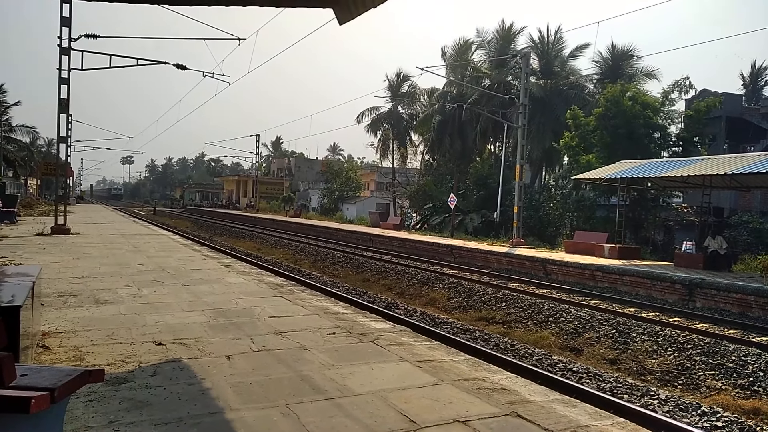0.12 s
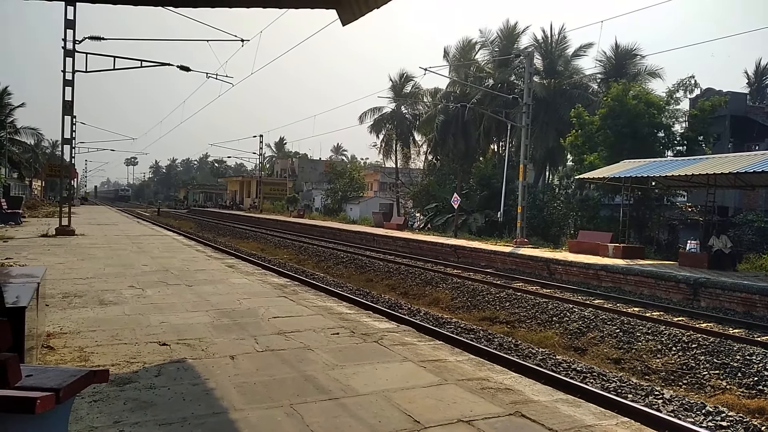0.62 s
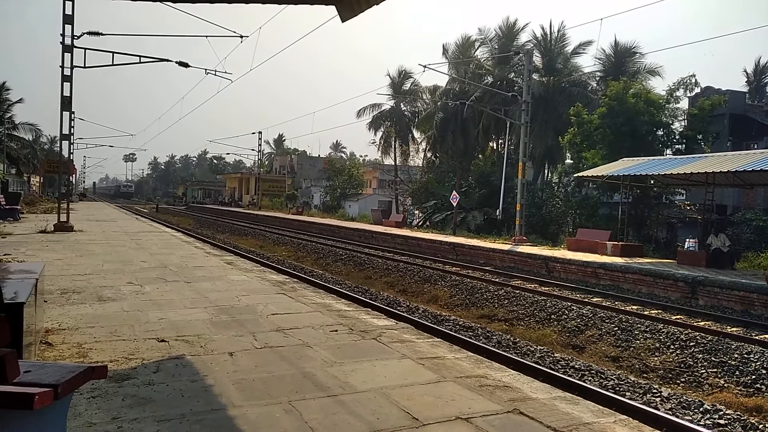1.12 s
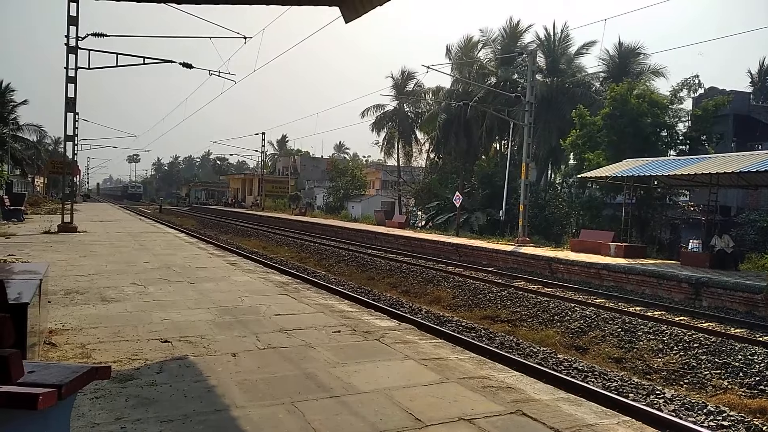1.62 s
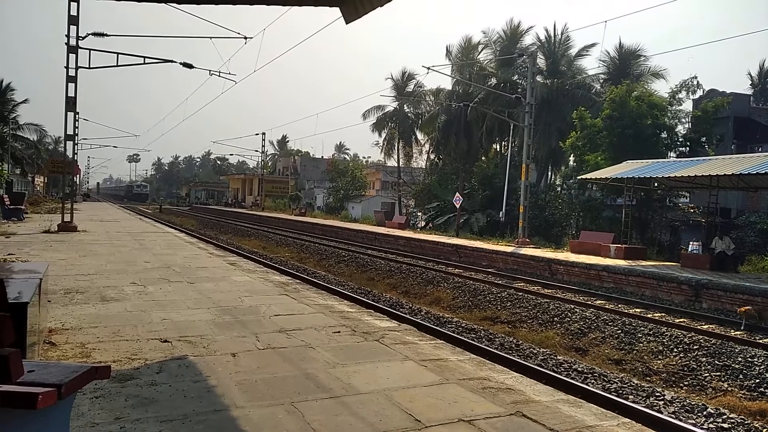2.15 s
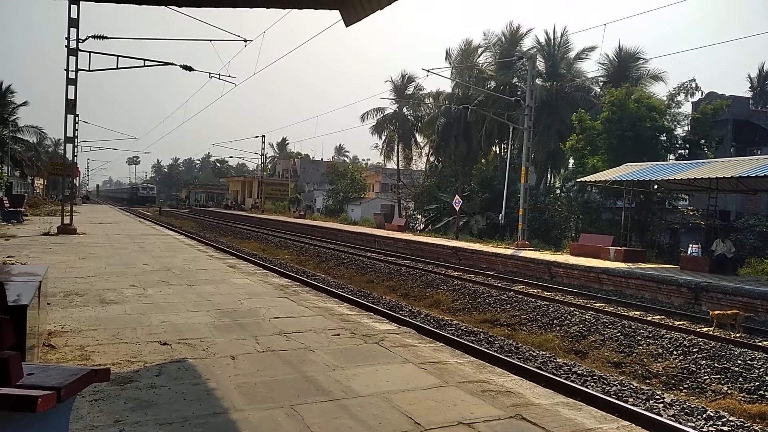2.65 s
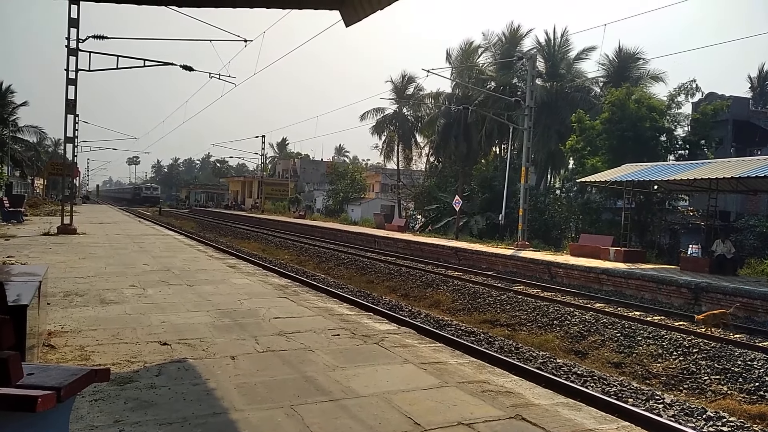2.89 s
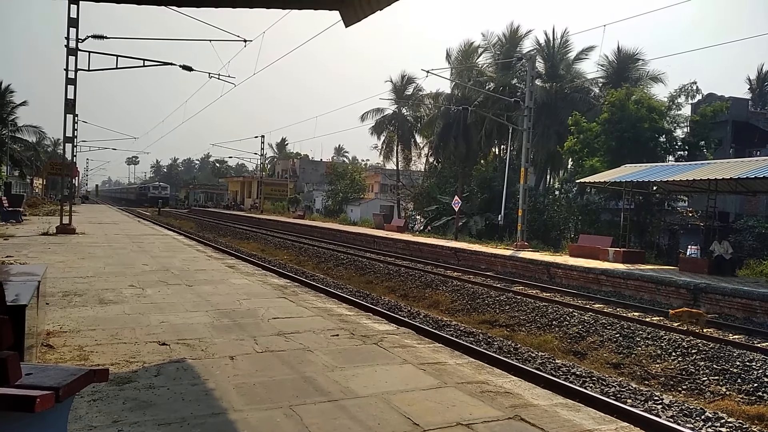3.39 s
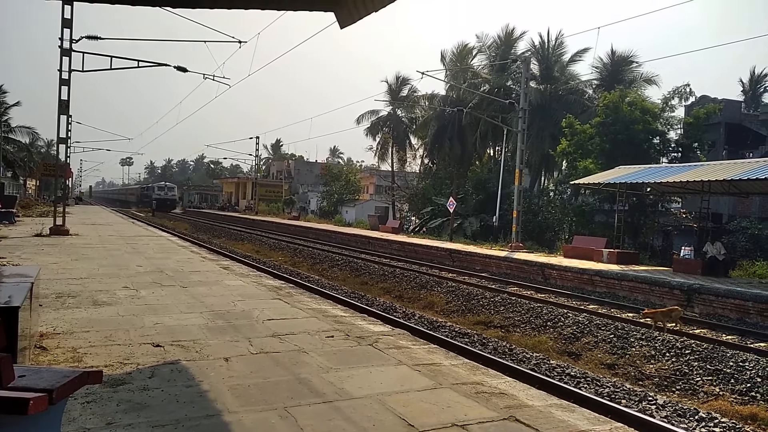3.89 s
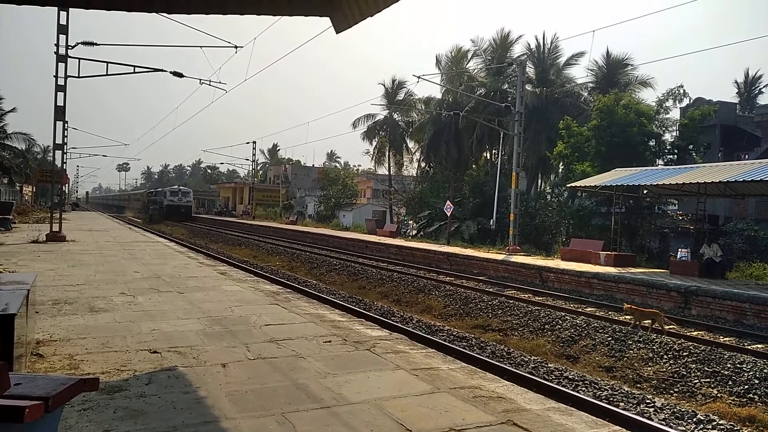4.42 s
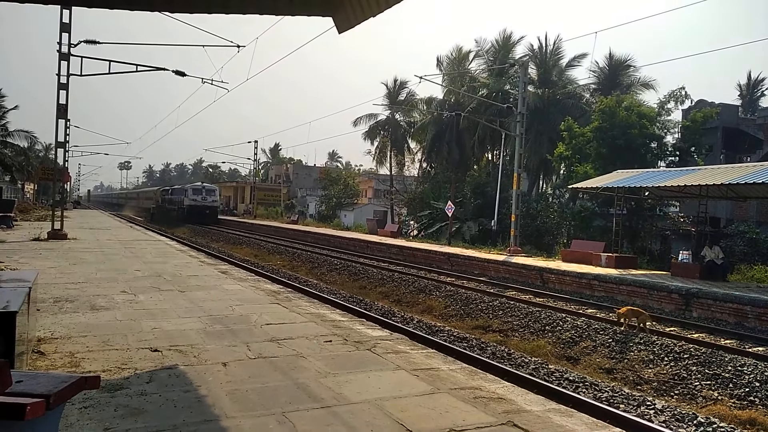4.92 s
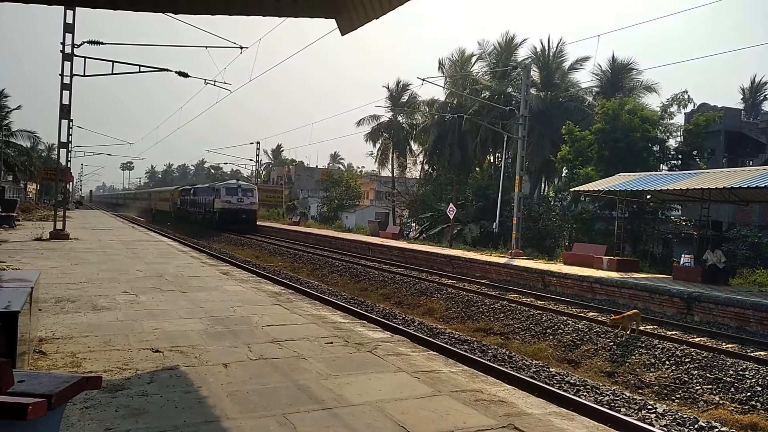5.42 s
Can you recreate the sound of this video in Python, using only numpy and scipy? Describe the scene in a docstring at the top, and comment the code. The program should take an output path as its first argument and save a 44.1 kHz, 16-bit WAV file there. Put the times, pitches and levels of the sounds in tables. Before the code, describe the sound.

A diesel locomotive comes towards a platform. After a brief hushed start with tiny chirps, its dissonant reed horn holds one long blast, buzzing and fluttering in the air, then cuts off into scattered echoes. Engine throbs, wheel roar, wandering whines and clatter come forward, with a breathy falling squeal and rising hiss. Outdoor, dry, small stereo device with close-set microphones, slightly overloaded on the horn.

```python
"""Station platform: a diesel locomotive comes fast and holds its two-tone air horn for about three seconds.
Two reed trumpets a tritone apart are summed from partials; squaring breeds sum and difference tones.
The engine throbs on shaft orders under boomy noise; wheels roar as noise bands and knock as struck modes.
The treble hisses in swells and a bird chirps far off in gliding tones.
Two microphone ports a few centimetres apart differ in level, phase and noise."""
import sys
import numpy as np
from scipy import signal
from scipy.fft import rfft, irfft, next_fast_len
from scipy.io import wavfile
from scipy.ndimage import uniform_filter1d, minimum_filter1d, map_coordinates

SR = 44100
rng = np.random.default_rng(int(sys.argv[2]) if len(sys.argv) > 2 else 0)


def dump_mix(stems):
    """Bounce the given channels to the path in sys.argv[1] as a 16-bit WAV at rate SR."""
    frames = np.atleast_2d(stems).T  # one column per channel
    limited = np.clip(frames, -1, 1)  # hard clip at full scale
    pcm = np.round(limited * 32767).astype(np.int16)
    wavfile.write(sys.argv[1], SR, pcm)


def amplitude_ratio(level_db):
    """Convert a level in decibels to the matching linear amplitude (field) ratio."""
    exponent = np.asarray(level_db, float) / 20
    return 10 ** exponent


N = 244314
T = np.arange(N) / SR
SIDES = np.array([[1], [-1]])  # left, right
PORT_LAG_S = .00019  # broad noise reaches the left port this late
OPEN_S, MIDDLE_S = .47, 2.2  # horn valve opens; middle of the blast


def read(table):
    """Columns of a table interpolated over time."""
    s, *columns = np.transpose(table)
    return [np.interp(T, s, c) for c in columns]


def at(table, hz):
    """Value of a spectrum table on a log frequency axis."""
    f, v = np.transpose(table)
    return np.interp(np.log(hz + 1), np.log(f + 1), v)


def unit(x):
    """Scale to rms 1."""
    return x / np.sqrt(np.mean(x ** 2))


def walk(rate, count=1):
    """Smooth chance with spread near 1, turning about rate times a second."""
    knots = rng.standard_normal((count, 600))
    return np.array([map_coordinates(k, [T[::16] * rate], order=3).repeat(16)[:N] for k in knots])


def noise(gain, alike_hz=2050.0):
    """Stereo noise with gain(Hz), rms 1; the bass is nearly alike at both ports, the treble less so."""
    # Each row: frequency in Hz, left minus right in dB.
    noise_balance = [(100, 0), (2000, -0.5), (3000, 0), (4400, -3), (5300, -11), (6200, -9), (8000, 3.5)]
    size = next_fast_len(N)
    f = np.fft.rfftfreq(size, 1 / SR)
    mid, side = rfft(rng.standard_normal((2, size)))
    apart = np.clip(f / alike_hz, .26, .8)
    ports = (mid + SIDES * apart * side) / np.sqrt(1 + apart ** 2)
    balance = amplitude_ratio(SIDES * at(noise_balance, f) / 2)
    lag = np.exp(-1j * np.pi * f * PORT_LAG_S * SIDES)
    return unit(irfft(gain(f) * balance * lag * ports)[:, :N])


def glides(table, blur_db):
    """Short gliding near-sines, blurred by a random level."""
    out = np.zeros(N)
    for s, length_s, f0_hz, f1_hz, db in table:
        u = np.clip((T - s) / length_s, 0, 1)
        turn = 2 * np.pi * np.cumsum(f0_hz + (f1_hz - f0_hz) * u) / SR
        out += amplitude_ratio(db + blur_db * walk(59.0)[0]) * np.sin(np.pi * u) * np.cos(turn)
    return out * np.sqrt(2)


def pitch(hz, sharp, settle_s, lift):
    """A reed starts sharp, settles quickly and lifts a little as the valve shuts."""
    lift_s, lift_width_s = 3.875, .055
    settling = np.exp(-(np.clip(T - OPEN_S, 0, None) / settle_s) ** .72)
    return hz * (1 + sharp * settling + lift * np.exp(-((T - lift_s) / lift_width_s) ** 2))


def blast(k, speaks_s, db, drift_db_per_s, bow_db, dies_s, burst_db):
    """Level in dB of one partial: quick rise with a burst, a drifting hold, a fall into a slower echo."""
    half_s, burst_s = 1.6, .02
    speak_db_per_s, die_db_per_s = 2201.5, 350
    surge_s, surge_width_s = 3.895, .045
    u = np.clip((T - MIDDLE_S) / half_s, -1, 1)
    hold = db + drift_db_per_s * half_s * u + bow_db * u ** 2
    since, after = T - speaks_s, np.clip(T - dies_s, 0, None)
    burst = burst_db * np.exp(-np.abs(since) / burst_s)
    rise = np.where(since < 0, burst_db + speak_db_per_s * since, burst)
    # the lowest tones surge as the valve shuts
    surge_db = 4.0 / k ** 2 * np.exp(-((T - surge_s) / surge_width_s) ** 2)
    # upper partials leave a stronger echo that dies faster
    echo_db = -16.5 / k ** 0.51 - 51 * k ** 0.28 * after
    return hold + rise + surge_db + np.maximum(-die_db_per_s * after, echo_db)


def trumpet(hz, table, burst_db, count, upper, start, bend):
    """A reed's pulse train as partials; moving air and ground bounce make each waver, the higher the more."""
    # The air between train and platform makes the chord waver.
    # Each row: time in seconds, change of the lowest tones in dB, change of the upper tones in dB.
    waver_db = [(.6, -9, 6), (.85, -3.5, 5), (1.15, -6.5, 3), (1.4, -0.5, 1.5), (1.62, -5, 0),
                (1.9, 0.5, 1), (2.2, 2.5, 0), (2.42, -0.5, -1), (2.62, 4.5, -0.5), (2.85, -3, 0),
                (3.1, -2, 1), (3.4, -3.5, 1.5), (3.6, -4.5, 0.5), (3.8, -6, 1)]
    # The brassy partials fade and return. Each row: time in seconds, change in dB.
    brass_db = [(.6, -1), (1.0, 1), (1.6, 2.5), (2.2, -0.5), (2.5, 0.5), (2.9, -3.5), (3.3, 2.5),
                (3.8, -0.5)]
    # Phase of the front at the ports. Each row: frequency in Hz, lead of the left in radians.
    port_phase = [(0, 0), (320, 0.31), (460, 0.44), (650, -0.26), (920, -0.74), (1290, -1.5), (1390, -1.02),
                  (1610, -2.5), (1840, -1.5), (1940, -2.5), (2260, -3), (2580, -2.5), (2770, -3.5),
                  (2900, -4), (3230, -4), (3690, -4.5), (4150, -5.5), (4840, -6.2), (5510, -7),
                  (8610, -11.5)]
    # Level of the front at the ports. Each row: frequency in Hz, left minus right in dB.
    port_balance = [(100, -1), (320, 1), (460, -2.5), (650, 0.2), (920, 7.5), (970, -6.5), (1290, 3),
                    (1600, 1), (1940, 4), (2260, -4), (2600, -1.5), (3700, -2), (4400, -2), (4900, -10.5),
                    (5500, -9), (6500, 6), (9000, 11)]
    brass_hz = 2700., 3200.  # where the brass fading sets in
    late_hz, late_db, late_s = 4900., -15, 0.42  # the highest partials build up slowly
    scatter = .08  # blur of a partial at 1 kHz by moving air
    calm_share = 0.62  # the chord wavers less at first
    flutter, rasp = 1.0, .2  # shares of quicker blur
    shared_waver = 0.34  # crossfeed of the wavering between ports
    valve_shut_s, echo_scatter = 3.85, 1.06

    strong = [round(row[0]) for row in table[:-1]]
    db = [blast(*row, burst_db) for row in table]
    turn = 2 * np.pi * np.cumsum(hz) / SR
    # once the valve shuts only scattered echoes are left
    echoes = echo_scatter * np.clip((T - valve_shut_s) / 0.13, 0, 1)
    calm = np.interp(T, [OPEN_S, MIDDLE_S], [calm_share, 1])
    late = late_db * np.exp(-np.clip(T - OPEN_S, 0, None) / late_s)
    low_db, upper_db = read(waver_db)
    brassy_db = read(brass_db)[0]
    out = np.zeros((2, N))
    for k in range(1, count + 1):
        f = k * hz[N // 2]
        if k in strong:
            level_db = db[strong.index(k)]
        else:
            level_db = db[-1] + np.interp(k, *np.transpose(upper))
        level_db = level_db + low_db + (upper_db - low_db) * min(f / 1000, 1)
        level_db = level_db + np.interp(f, brass_hz, [0, 1]) * brassy_db + (f > late_hz) * late
        share = min(scatter * (f / 1000) ** 1.36, 2.5) * calm + echoes
        waver = walk(5.09, count=4)
        waver = waver + (flutter + echoes) * walk(22., count=4)
        waver = waver + (rasp + echoes / 2) * walk(90., count=4)
        alone = waver.reshape(2, 2, N)  # real or imaginary, port, time
        re, im = share * (alone + shared_waver * alone[:, ::-1]) / np.hypot(1, shared_waver)
        lead = np.interp(f, *np.transpose(port_phase))
        phase = k * turn + start * (k - 1) - bend * k ** 2 + np.array([[lead], [0]])
        ports = amplitude_ratio(SIDES * at(port_balance, f) / 2) * np.sqrt(2 / (1 + 2 * share ** 2))
        out += ports * amplitude_ratio(level_db) * ((1 + re) * np.cos(phase) - im * np.sin(phase))
    return out


def horn():
    """Both trumpets; loud air squares the wave a little, which breeds tones between the two stacks."""
    # Strong partials of each trumpet, the last row for all upper ones, before wavering.
    # Each row: multiple, start in seconds, mid-blast level in dB, drift in dB per second,
    # both ends over the middle in dB, end in seconds.
    low_strong = [(1, .49, -26.5, 3, 1.5, 3.93), (2, 0.49, -26.5, 2, 0.5, 3.9),
                  (4, 0.496, -26.5, -0.5, -6, 3.91), (5, 0.51, -26.5, -0.5, -4.5, 3.92),
                  (6, .493, -29, -0.5, -2.5, 3.86), (7, 0.488, -29.5, -0.5, -3, 3.84)]
    high_strong = [(1, 0.4776, -27, 2, 2.5, 3.925), (2, .478, -31, 2, 4, 3.84),
                   (3, 0.487, -26.5, 0.9, -6, 3.83), (4, .484, -28.5, 1, -9.5, 3.88),
                   (5, .487, -31.5, 1.85, 0, 3.84)]
    # Partials that follow the upper level. Each row: multiple, dB over that level.
    low_upper = [(3, -7.5), (7, -4), (8, -5.5), (9, -3.5), (10, -19), (11, -10), (12, -13.5), (13, -18.5),
                 (14, -26), (15, -21), (16, -31), (17, -23.5), (18, -41), (19, -25.5), (20, -35), (21, -42),
                 (26, -43)]
    high_upper = [(5, -2.5), (6, -5), (7, -9.5), (8, -9), (9, -12), (10, -20.5), (11, -27.5), (12, -21),
                  (13, -31), (14, -46), (18, -42)]
    # Air blown through the trumpets and scattered by the yard.
    # Each row: frequency in Hz, relative density in dB per Hz.
    blown_colour = [(150, -24), (300, 0), (550, -11.5), (800, 6), (1080, -5), (1500, -3.5), (2130, -12),
                    (2700, -3), (3050, -4), (3400, -16), (4000, -6.5), (4500, -4), (6500, -24),
                    (10000, -22), (13000, -61)]
    # settled Hz, share sharp at the start, settling s, share of lift as the valve shuts
    low_hz = pitch(322.65, .048, .033, .003)
    high_hz = pitch(460.93, .06, .026, .013)
    both = trumpet(low_hz, low_strong, 0.1, 26, low_upper, 0., 0.0897)
    both += trumpet(high_hz, high_strong, 6.4, 18, high_upper, 3.23, 0.11)
    above = signal.butter(3, 210, "high", fs=SR, output="sos")
    loudness = np.sqrt(uniform_filter1d((both ** 2).mean(axis=0), size=1500) + 1e-12)
    blown = noise(lambda f: amplitude_ratio(at(blown_colour, f))) * loudness * amplitude_ratio(-20.0 + 0.69 * walk(25.1))
    return both + 0.29 * signal.sosfilt(above, both ** 2) + blown


def horn_echoes():
    """Single horn tones that come back off the buildings around and after the valve's shutting."""
    # Each row: start in seconds, length in seconds, start in Hz, end in Hz, level in dB.
    echo_tones = [(3.84, 0.067, 1410, 1390, -27), (3.85, 0.1, 954, 968, -30), (3.89, 0.085, 980, 970, -41),
                  (3.9, 0.121, 645, 656, -21.5), (3.94, 0.075, 460, 466, -25.5),
                  (3.95, 0.085, 925, 907, -28), (3.9, 0.067, 1220, 1175, -39),
                  (3.96, 0.031, 1290, 1240, -31), (3.9, .08, 1860, 1920, -40), (3.95, 0.056, 820, 804, -33),
                  (4.0, 0.09, 662, 628, -41), (4.04, 0.045, 463, 490, -41), (4.09, 0.051, 451, 455, -31.5),
                  (4.14, 0.064, 453, 458, -36)]
    return glides(echo_tones, 2.2)


def engine():
    """Shaft orders that fade on their own, over boomy exhaust noise; the firing tone swells in long throbs."""
    # Low while the horn sounds, then throbbing. Each row: time in seconds, level in dB before trim.
    engine_level = [(0.0, -48), (0.37, -46.5), (0.59, -59), (2.42, -46.5), (2.64, -50.5), (3.32, -41),
                    (3.45, -55), (3.95, -39), (3.96, -23), (4.14, -41), (4.18, -34), (4.32, -30),
                    (4.37, -32), (4.41, -24), (4.57, -29), (4.68, -22), (4.7, -41), (4.83, -24.5),
                    (5.05, -29), (5.06, -24), (5.11, -41), (5.14, -24), (5.4, -24.5), (5.43, -29),
                    (5.48, -21), (5.54, -32)]
    # Each row: multiple of the shaft, relative level in dB.
    engine_orders = [(2, -47), (4, -16), (6, -5), (7, 0), (9, -1.5), (12, -39), (13, -23), (15, -10),
                     (17, -16)]
    # The firing tone and the order above it that answers in turns.
    # Each row: time in seconds, firing level in dB, answering level in dB, before the far and port offsets.
    firing_level = [(3.6, -47.5, -49), (3.756, -39.5, -53), (3.798, -43, -56), (3.842, -40, -41),
                    (3.966, -30, -35), (4.112, -44, -40), (4.198, -23.5, -34), (4.312, -22.5, -52),
                    (4.356, -31, -43), (4.432, -22.5, -28), (4.512, -32, -32), (4.544, -37, -41),
                    (4.598, -26, -36), (4.642, -30, -49), (4.674, -25, -46), (4.718, -44, -35),
                    (4.788, -30, -37), (4.82, -23.5, -26), (4.906, -43, -35.5), (5.096, -46, -48),
                    (5.128, -34, -35), (5.258, -21.5, -32), (5.35, -23, -23), (5.382, -18, -40),
                    (5.414, -23, -31), (5.54, -31, -52)]
    firing_orders = [(8, 3), (16, -18), (24, -21.5)]  # multiple of the shaft, relative dB
    answering_orders = [(10, 0)]
    shaft_hz, trim_db = 15.4, -3.5
    far_firing_db = -4  # the firing tone stands out less while the train is far
    turn = 2 * np.pi * np.cumsum(shaft_hz * (1 + 0.00327 * walk(1.48)[0])) / SR

    def orders(table, sway_db):
        """Sum of shaft multiples, each swaying in level and phase."""
        out = 0
        for (k, db), sway in zip(table, walk(3., count=len(table))):
            phase = k * turn + 1.05 * sway + rng.uniform(0, 2 * np.pi)
            out = out + amplitude_ratio(db + sway_db * sway) * np.cos(phase)
        return out

    level_db = read(engine_level)[0]
    boom = noise(lambda f: 1 / (1 + ((f - 125) / 35) ** 4))
    rest = unit(unit(orders(engine_orders, 2.2)) + 0.77 * boom)
    firing_db, answering_db = read(firing_level)
    throbs = amplitude_ratio(firing_db) * unit(orders(firing_orders, 0.99))
    throbs = throbs + amplitude_ratio(answering_db) * unit(orders(answering_orders, .4))
    # ahead of its table the firing tone follows the engine level
    near_s = firing_level[0][0]
    far_db = np.minimum(level_db - np.interp(near_s, T, level_db) + far_firing_db, 6) * (T < near_s)
    return amplitude_ratio(level_db + trim_db) * rest + amplitude_ratio(far_db - 1.0 * SIDES) * throbs


def clatter():
    """Wheel knocks ring modes of the running gear at random moments, a few blows much harder than the rest."""
    # Each row: frequency in Hz, t60 in seconds, level in dB over the roar.
    modes = [(476, 0.13, -22.5), (588, 0.14, -17.5), (820, 0.12, -14.5), (1012, .1, -21.5),
             (1123, 0.18, -17), (1400, 0.15, -21.5), (1563, 0.087, -22), (1750, 0.094, -19),
             (1960, .08, -18), (2420, .06, -12), (3090, .05, -34)]
    knocks_per_s, knock_spread_db = 30., 4.
    out = 0
    for hz, t60_s, db in modes:
        when, size, pan = rng.random((3, 600))
        sample = (np.cumsum(-np.log(1 - when)) / knocks_per_s * SR).astype(int)
        keep = sample < N
        force = amplitude_ratio(-knock_spread_db * np.log(1 - size) + 10.0 * SIDES * (pan - .5))
        blows = np.zeros((2, N))
        blows[:, sample[keep]] = force[:, keep]
        blows[0] = np.roll(blows[0], round(PORT_LAG_S * SR))
        blows = uniform_filter1d(blows, size=round(SR / hz / 2))
        r = np.exp(-np.log(1000) / (t60_s * SR))
        poles = [1, -2 * r * np.cos(2 * np.pi * hz / SR), r ** 2]
        out = out + amplitude_ratio(db) * unit(signal.lfilter([1, 0, -1], poles, blows))
    return out


def roar():
    """Rolling noise in octave bands that swell together and flicker alone, with clatter and wavering whines."""
    # Wheels and rails. Each row: time in seconds, level in dB.
    roar_level = [(0, -45), (.2, -43), (.45, -43.5), (.6, -40.5), (1.5, -36.5), (2.5, -34.5), (3.5, -34.5),
                  (3.8, -31), (3.95, -25), (4.1, -31), (4.3, -30), (4.5, -30), (4.7, -29), (4.9, -30.5),
                  (5.1, -27.5), (5.3, -25.5), (5.54, -25.5)]
    # Each row: frequency in Hz, relative density in dB per Hz.
    roar_colour = [(30, -25), (60, -9), (80, -3.5), (130, -29), (190, 1), (320, -0.5), (700, -4), (900, 0),
                   (1150, -1), (1640, -0.5), (3000, -4.5), (4200, -5), (6000, -15.5), (8000, -15)]
    # Running gear. Each row: frequency in Hz, width in Hz, mean level in dB over the roar.
    whine_bands = [(616, 52, -17.5), (653, 104, -11.5), (730, 22, -19.5), (993, 69, -26.5),
                   (1174, 190, -23), (1245, 130, -10.5)]
    swell_db = 0.69 * walk(7.3)
    broad = 0
    for hz in 40 * 2. ** np.arange(8):
        band = noise(lambda f: amplitude_ratio(at(roar_colour, f)) * np.exp(-np.log2((f + 1) / hz) ** 2 * 1.4))
        broad = broad + amplitude_ratio(at(roar_colour, hz) + 2.0 * walk(13.)) * np.sqrt(hz) * band
    whines = 0
    for hz, width_hz, db in whine_bands:
        band = noise(lambda f: 1 / (1 + ((f - hz) / width_hz * 2) ** 2))
        whines = whines + amplitude_ratio(db + 3.5 * walk(9.)) * band
    return amplitude_ratio(read(roar_level)[0]) * (unit(broad) * amplitude_ratio(swell_db) + whines + clatter())


def surges():
    """Two narrow rough whines of the running gear that wander in pitch and swell in turns."""
    # Each row: time in seconds, low whine in Hz and dB, high whine in Hz and dB (pitch before
    # wander, level before trim).
    surge_track = [(4.05, 724, -47, 1225, -35), (4.178, 731, -29, 1211, -40), (4.206, 736, -49, 1228, -42),
                   (4.252, 726, -27.5, 1205, -50), (4.398, 730, -40, 1236, -25),
                   (4.44, 731, -54, 1206, -35), (4.568, 729, -33, 1203, -43), (4.576, 727, -41, 1170, -42),
                   (4.646, 733, -19, 1230, -35), (4.668, 731, -32, 1210, -39), (4.82, 730, -27, 1173, -31),
                   (4.888, 729, -39, 1197, -38), (5.02, 728, -27, 1218, -41), (5.036, 729, -45, 1220, -35),
                   (5.062, 738, -22.5, 1192, -42), (5.216, 732, -29, 1170, -31),
                   (5.252, 730, -39, 1163, -19), (5.328, 737, -37, 1200, -36), (5.348, 735, -49, 1180, -43),
                   (5.372, 724, -43, 1153, -28), (5.426, 728, -43, 1220, -45), (5.54, 734, -51, 1215, -46)]
    low_hz, low_db, high_hz, high_db = read(surge_track)
    out = 0
    for hz, db, width_hz in ((low_hz, low_db - 2.5, 19.), (high_hz, high_db - 4.0, 47.5)):
        rough = 0.29 + noise(lambda f: 1 / (1 + (f / width_hz) ** 4), alike_hz=30.)
        turn = 2 * np.pi * np.cumsum(hz * (1 + 0.01208 * walk(12.)[0])) / SR
        out = out + amplitude_ratio(db) * rough * np.cos(turn)
    return out * np.clip((T - surge_track[0][0]) / .08 + 1, 0, 1)


def rings():
    """The loudest rings of the running gear, as short near-sines."""
    # Each row: start in seconds, length in seconds, start in Hz, end in Hz, level in dB.
    ring_tones = [(4.275, 0.042, 1040, 1040, -36), (4.58, 0.046, 1090, 1100, -40),
                  (5.12, 0.068, 1960, 1960, -39), (5.195, 0.088, 1400, 1395, -33.5),
                  (5.35, .04, 1750, 1733, -36), (5.4, 0.062, 365, 380, -33)]
    return glides(ring_tones, 2.5)


def sliding_noise(table, width_hz, flicker_db):
    """Rough noise on a carrier sliding down, stronger on the left."""
    hz, db = read(table)
    rough = noise(lambda f: 1 / (1 + (f / width_hz) ** 2), alike_hz=30.)
    band = rough * np.cos(2 * np.pi * np.cumsum(hz) / SR) * amplitude_ratio(flicker_db * walk(30., count=2))
    return band * amplitude_ratio(db + 5.1 * SIDES) * (T > table[0][0]) * (T < table[-1][0])


def squeal():
    """A breathy squeal that falls, then a short puff of hiss, both sliding noise."""
    # Each row: time in seconds, centre in Hz, level in dB before port balance and carrier.
    squeal_track = [(4.3, 10100, -55), (4.45, 10000, -35), (4.5, 9900, -33), (4.56, 9780, -36),
                    (4.65, 9500, -34), (4.76, 9350, -33), (4.85, 9170, -43), (4.95, 9000, -53)]
    puff_track = [(4.96, 7430, -58), (5.0, 7330, -33.5), (5.05, 7200, -36), (5.12, 7060, -55)]
    return sliding_noise(squeal_track, 650., 4.0) + sliding_noise(puff_track, 550., 2.7)


def hiss(level_db, lo_hz, hi_hz):
    """A band of treble noise that flickers."""
    band = noise(lambda f: 1 / np.sqrt(1 + (lo_hz / (f + 1)) ** 8) / np.sqrt(1 + (f / hi_hz) ** 14))
    return band * amplitude_ratio(level_db + 2.0 * walk(14., count=2) + 0.72 * walk(7.))


def treble():
    """Two bands of swelling hiss, the lower one stronger on the left."""
    # Each row: time in seconds, level in dB before flicker and port balance.
    hiss_level = [(0, -55), (.25, -55.5), (.32, -51), (.43, -63), (.62, -43), (1.0, -37.5), (1.3, -40),
                  (1.43, -37.5), (1.6, -41), (2.1, -40.5), (2.45, -35), (3.2, -39.5), (3.5, -32.5),
                  (3.8, -36), (4.05, -47), (4.47, -32), (4.85, -41.5), (5.05, -36.5), (5.3, -34.5),
                  (5.54, -30)]
    # The topmost hiss. Each row: time in seconds, level in dB before flicker.
    top_level = [(0, -65), (.45, -71), (.65, -65), (1.1, -97), (2.3, -79), (3.0, -86), (3.75, -65),
                 (4.05, -46.5), (4.3, -40), (4.45, -36.5), (4.9, -41.5), (5.1, -33.5), (5.54, -34)]
    main = hiss(read(hiss_level)[0], 5660.0, 8800.0) * amplitude_ratio(1.64 * SIDES)
    return main + hiss(read(top_level)[0], 13000., 16300.)


def rumble():
    """Deep noise around 50 Hz, partly wind on the ports."""
    # Each row: time in seconds, level in dB.
    rumble_level = [(0.0, -61), (0.04, -67), (0.48, -57), (0.83, -74), (0.94, -62), (2.62, -53),
                    (2.81, -61), (4.15, -60), (4.78, -49), (4.95, -60), (5.26, -48), (5.54, -53)]
    deep = noise(lambda f: (f / 48) ** 3 / (1 + (f / 48) ** 9), alike_hz=100.)
    return amplitude_ratio(read(rumble_level)[0] + 2.0 * walk(5.2)) * deep


def bird():
    """Faint short gliding tones, blurred by distance."""
    # Each row: start in seconds, length in seconds, start in Hz, end in Hz, level in dB.
    chirp_tones = [(.08, .07, 4100, 4030, -53), (.16, .06, 4530, 4400, -54), (.24, .08, 1330, 1310, -54),
                   (.27, 0.056, 4100, 4160, -50), (.285, .055, 4420, 4330, -54),
                   (.38, 0.074, 1330, 1310, -44)]
    return glides(chirp_tones, 2.7)


def scene():
    """Horn over the approaching train."""
    train = engine() + roar() + surges() + rings() + squeal()
    return horn() + horn_echoes() + train + treble() + rumble() + bird()


def limiter(x, floor, share, hold=240, slow=957):
    """Gain shared by both ports, keyed to held peaks of the upper tones: it ducks at each beat of the chord."""
    # hold and slow in samples
    key = signal.sosfilt(signal.butter(2, 750, "high", fs=SR, output="sos"), x)
    peak = -minimum_filter1d(-np.abs(key).max(axis=0), size=hold)
    peak = uniform_filter1d(peak, size=hold // 2) + floor
    return x * (uniform_filter1d(peak, size=slow) / peak) ** share


def top_cut(x):
    """Nothing passes above the cut-off."""
    return signal.sosfilt(signal.butter(12, 15700, fs=SR, output="sos"), x)


def record(dry):
    """Quick gain control, an input stage that rounds tall peaks, and a cut at the top."""
    held = limiter(dry, .05, 1.3)
    rounded = np.tanh(1.135 * held) / 1.062
    cut = signal.ellip(8, .2, 70, 15200, fs=SR, output="sos")
    return top_cut(signal.sosfilt(cut, rounded))


dry = scene()
out = record(dry)
dump_mix(out)
```